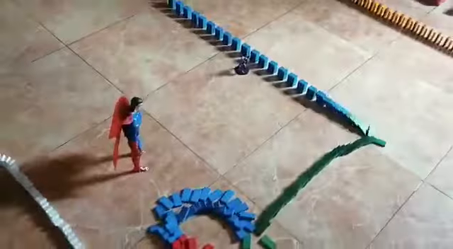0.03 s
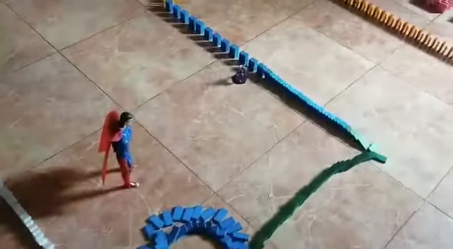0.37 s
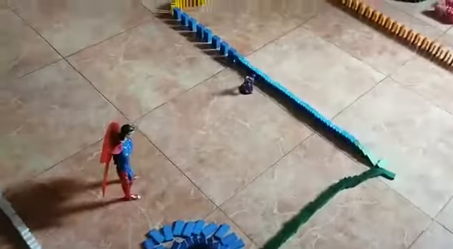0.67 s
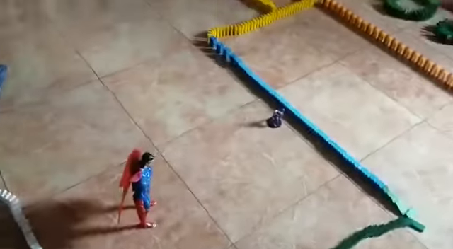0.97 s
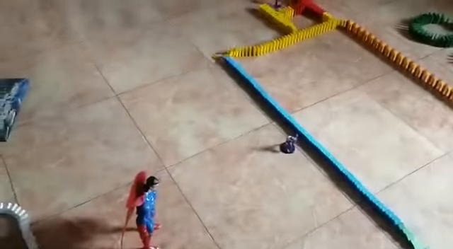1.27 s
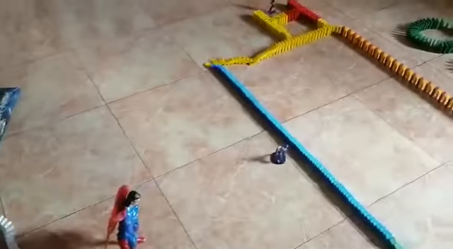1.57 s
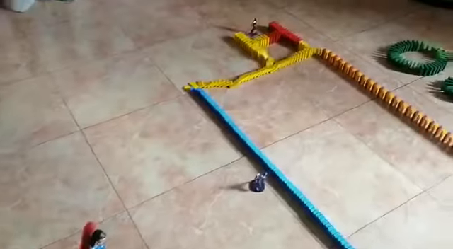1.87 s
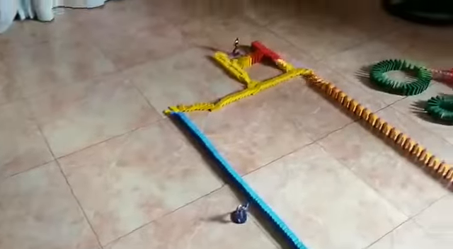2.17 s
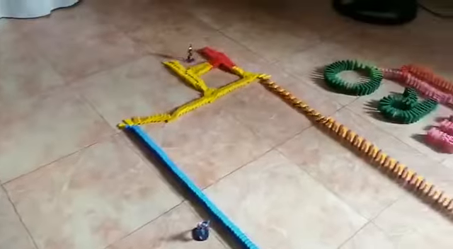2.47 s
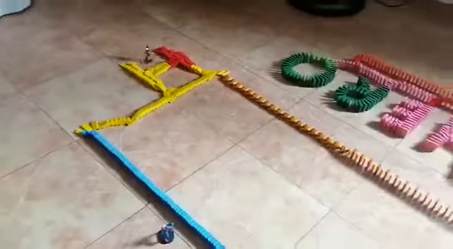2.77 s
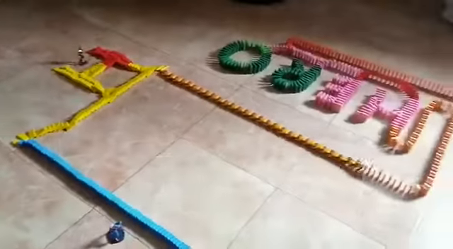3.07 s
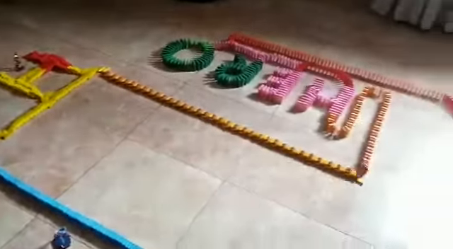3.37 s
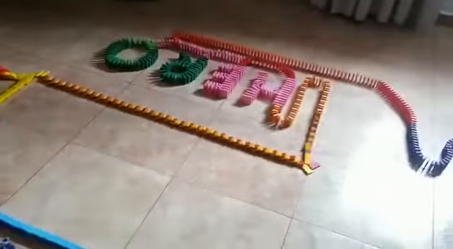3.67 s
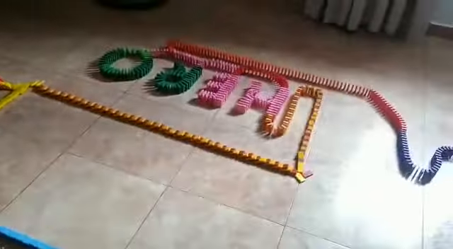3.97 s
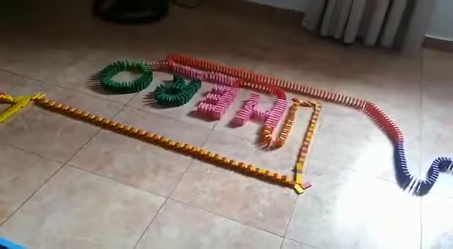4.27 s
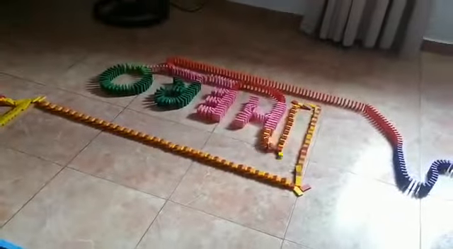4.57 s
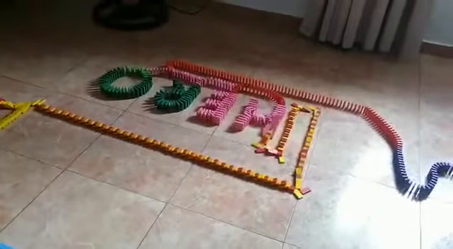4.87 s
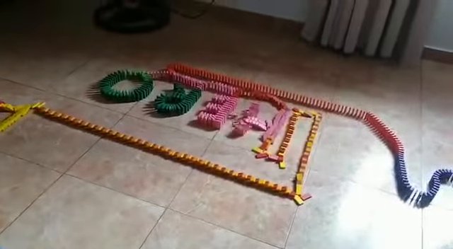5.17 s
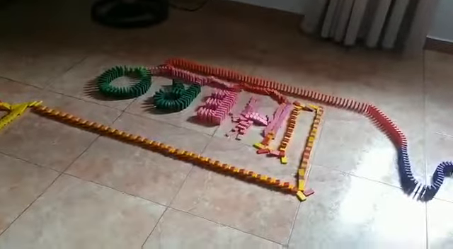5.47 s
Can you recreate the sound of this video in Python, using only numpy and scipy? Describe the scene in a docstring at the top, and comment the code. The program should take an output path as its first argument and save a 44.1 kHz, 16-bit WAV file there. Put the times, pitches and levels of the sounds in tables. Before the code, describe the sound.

Small plastic dominoes topple on a tiled floor, first clack by clack, then in a fast, dense clatter in an echoing room.

```python
"""A widely spaced row of plastic dominoes falls clack by clack on a tiled floor in a bare room.
Then a dense clatter runs along tight rows and sets off whole blocks, with hard hits and brief rings.
Each contact is a dry knock, a hollow clonk on the floor, a bright snap of the edges and a short ring
of the domino (a "tile" below). The room's echoes blur them over a low rumble."""
import sys
import numpy as np
from scipy import signal
from scipy.fft import rfft, irfft
from scipy.io import wavfile
from scipy.ndimage import uniform_filter1d

SR = 44100
rng = np.random.default_rng(int(sys.argv[2]) if len(sys.argv) > 2 else 0)


def store_pcm(level_fs):
    """Save levels as 16-bit WAV."""
    pcm = np.round(np.clip(level_fs, -1, 1) * 32767).astype(np.int16)
    wavfile.write(sys.argv[1], SR, np.atleast_2d(pcm).T)


N = 251811
TIME = np.arange(N) / SR
SIDES = np.array([[1], [-1]])  # left, right


# Tight rows: t/s, knock level/dB, clonk/dB, snap/dB, ring/dB (last three re knock), ring f/Hz
TIGHT_ROWS = [(1.06, -74, 13, -11, -7, 8000), (1.2, -57, -2, -9, -14, 7500),
              (1.26, -51, -3.5, 0.5, 3, 8000), (1.45, -49, -4.5, -15, -1, 8170),
              (1.64, -47, -5, -5.5, -0.5, 7700), (1.9, -45, -1, -6.5, -7, 7830),
              (2.3, -47.5, -1, -6.5, 2.5, 7750), (2.44, -47.5, -6.5, -3.5, -3, 7160),
              (2.62, -50, -3, -4, 0, 7750), (2.8, -55.5, 0, -5.5, 9, 8190),
              (2.94, -53.5, -1, -1, 3.5, 7870), (3.05, -53, -2.5, -13, 3.5, 8200),
              (3.15, -49, -7, -7, 4, 8620), (3.24, -51.5, -2.5, -7, -8.5, 8700),
              (3.4, -56, -5, 2, -14, 7640), (3.58, -50, -3, -10, 1, 8250),
              (3.75, -51.5, -4, -5.5, 2.5, 8700), (3.9, -58.5, 1.5, -7.5, 0, 8100),
              (3.99, -48, -7.5, -11.5, -2.5, 7180), (4.14, -57, 0, 2.5, -6, 7700),
              (4.27, -51.5, 0, -6.5, 4, 7950), (4.35, -51.5, -2, -5, 6, 7830),
              (4.42, -57.5, 0.5, -2, 3, 7300), (4.5, -55.5, -7, -1.5, 8, 7460),
              (4.68, -52.5, -0.5, -13, -5.5, 7500), (4.76, -52.5, 1.5, -3, 3.5, 7260),
              (5.06, -54.5, 4, 1, -8, 7860), (5.12, -48.5, -0.5, -2, -3, 7970),
              (5.4, -47.5, -5, -5.5, -5, 7540), (5.5, -53, 1.5, -5, 1, 7450),
              (5.71, -46.5, 1.5, -4, 2, 7530)]
def clatter(count=280, trim_db=-3, snap_trim_db=4, ring_trim_db=-3, tile_detune=0.0455):
    """Tiles fall along tight rows at an even pace; each keeps its own pitch as it chatters."""
    t_s, *columns = np.transpose(TIGHT_ROWS)
    span_s = t_s[-1] - t_s[0]
    falls_s = t_s[0] + span_s * (np.arange(count) + rng.random(count)) / count
    times_s, force_db = chatter(falls_s, span_s, chatter_s=0.014, scatter_db=4, bounce_gain_db=0.05)
    db, clonk_db, snap_db, ring_db, ring_hz = (np.interp(times_s, t_s, c) for c in columns)
    pan_db = np.interp(times_s, t_s[[0, -1]], (-5, -1.5))  # the microphone turns after the falling front
    own_pitch = np.repeat(np.exp(tile_detune * rng.standard_normal(count)), len(times_s) // count)
    return contacts(times_s, db + force_db + trim_db, clonk_db, snap_db + snap_trim_db,
                    ring_db + ring_trim_db, ring_hz * own_pitch, pan_db,
                    ring_detune=0.014, clonk_hz=2740, clonk_detune=0.0706, clonk_ring_db=-10.5)


# Falling blocks: t/s, length/s, knock level/dB, clonk/dB, snap/dB, ring/dB (last three re knock)
BLOCKS = [(1.351, 0.16, -51.5, -4.5, -11, -18), (1.508, 0.06, -46.5, -7, -10, -10),
          (2.058, 0.072, -45.5, -29, -3, -6), (2.139, 0.15, -48.5, 1.5, -7, -10),
          (2.333, 0.045, -40, -15, -8, -5), (3.259, 0.077, -49, -19.5, -11.5, -20),
          (4.8, .15, -51, 3.5, -22, -3), (4.93, .11, -53.5, 4.5, -15, -9),
          (5.168, 0.15, -44, -16, -8.5, -8), (5.594, 0.2, -57.5, 5, -11, -3)]
# Landing on a heap, less body than on the floor: f/Hz, level/dB
HEAP_EQ = [(700, -4.5), (1400, -1), (2200, -0.5)]
def collapses(count=13, edge_db=-4, trim_db=-2, snap_trim_db=7, ring_trim_db=-3):
    """A block goes down in one swell of tiles, loudest in the middle."""
    rows = []
    for start_s, length_s, db, *colour_db in BLOCKS:
        falls_s = start_s + length_s * (np.arange(count) + rng.random(count)) / count
        times_s, force_db = chatter(falls_s, length_s, chatter_s=0.008, scatter_db=-5.5, tile_db=-3)
        swell_db = edge_db * (2 * (times_s - start_s) / length_s - 1) ** 2
        rows.append(np.c_[times_s, db + force_db + swell_db, np.tile(colour_db, (len(times_s), 1))])
    times_s, db, clonk_db, snap_db, ring_db = np.vstack(rows).T
    tiles = contacts(times_s, db + trim_db, clonk_db, snap_db + snap_trim_db, ring_db + ring_trim_db,
                     ring_hz=7450, pan_db=-3.5, ring_detune=0.03,
                     clonk_hz=2876, clonk_detune=0.132, clonk_ring_db=-9)
    return shaped(tiles, HEAP_EQ)


# Wide row: t/s, knock level/dB, rebound/dB, clonk/dB, snap/dB (these re knock), clonk f/Hz, ring f/Hz
WIDE_FALLS = [(0.0004, -47.5, -8, -6.5, -3.5, 2740, 7900), (.057, -52.5, -2, -1, -1, 2950, 7400),
              (.127, -50.5, -5, -1.5, 0.5, 2630, 7960), (0.183, -55.5, -0.5, 2.5, 0, 2420, 7850),
              (0.2492, -56, -5, -1, -3.5, 2840, 8600), (0.316, -47.5, 1.5, -1, -7, 2640, 7400),
              (0.369, -56.5, 4.5, 0, 2, 2560, 7660), (0.434, -49.5, 1.5, -5.5, -0.5, 2700, 8800),
              (0.5073, -55.3, 0.5, -4, 4, 2700, 7870), (0.5756, -51.5, -5, 0.5, -1, 2650, 8100),
              (0.6288, -61, 6, 3.5, 0.5, 2420, 8000), (0.7026, -52.5, 0, 0, -3, 2550, 7900),
              (0.778, -51, -3, -3, 1, 2580, 8030), (.832, -55, 1, -3.5, 1.5, 2630, 9230),
              (0.9236, -51, -0.5, 2, -0.5, 2730, 7300), (.982, -55, -7, 6, 2, 2880, 8800),
              (1.06, -57, -2, 4, -2, 3100, 7850)]
# One clack, two strike touches then three rebounds: delay/s, level/dB, extra clonk/dB
CLACK_TOUCHES = [(0, -1.2, -0.5), (.0018, -3, 3), (.0074, -1.5, 0.5), (.0122, -8, 2), (.0205, -9, -12)]
# A lone tile, landing more softly than a packed row: f/Hz, level/dB
LONE_TILE_EQ = [(800, 3), (2000, 3.5), (9500, 2.5), (12000, -1.5), (15000, 2.5)]
def wide_row(hit_s=0.0044, jitter_s=0.0005, dulling_db=-8):
    """A tile strikes the next with a bright double tick; the leaning stack knocks, duller and fading."""
    falls = np.repeat(WIDE_FALLS, len(CLACK_TOUCHES), axis=0)
    t_s, db, rebound_db, clonk_db, snap_db, clonk_hz, ring_hz = falls.T
    delay_s, touch_db, hollow_db = np.tile(CLACK_TOUCHES, (len(WIDE_FALLS), 1)).T
    is_rebound = np.tile(np.arange(len(CLACK_TOUCHES)), len(WIDE_FALLS)) >= 2
    times_s = t_s + delay_s + is_rebound * jitter_s * rng.uniform(-1, 1, len(t_s))
    energy_db = db + 10 * np.log10(hit_s * SR) + touch_db + is_rebound * rebound_db
    edge_db = snap_db + 1 + is_rebound * dulling_db  # a sharper contact both snaps and rings more
    hits = contacts(times_s, energy_db, clonk_db + hollow_db, edge_db, edge_db, ring_hz,
                    pan_db=-2 - 5 * is_rebound, ring_detune=0.0091,
                    clonk_hz=clonk_hz, clonk_detune=0.064, clonk_ring_db=-10.5, knock_s=0.0011)
    return shaped(hits, LONE_TILE_EQ)


def settling(count=20, slide_s=0.08, level_db=-62, fade_db_per_s=110, scatter_db=3):
    """After each fall the wide row slides down on itself in a fading patter."""
    t_s, _, _, clonk_db, snap_db, clonk_hz, ring_hz = np.repeat(WIDE_FALLS, count, axis=0).T
    age_s = slide_s * rng.random(len(t_s))
    energy_db = level_db + 10 * np.log10(slide_s * SR / count) - fade_db_per_s * age_s
    energy_db += scatter_db * rng.standard_normal(len(t_s))
    return contacts(t_s + age_s, energy_db, clonk_db - 1, snap_db, ring_db=snap_db - 4,
                    ring_hz=ring_hz, pan_db=-5, ring_detune=0.058,
                    clonk_hz=clonk_hz, clonk_detune=0.112, clonk_ring_db=-11.5)


# Hard landings: t/s, knock level/dB, clonk/dB, snap/dB, ring/dB (these re knock), ring f/Hz, L-R/dB
HARD_LANDINGS = [(0.327, -51, -9, -8, -7, 7100, 3), (0.3358, -53, -12, -8, -1, 6900, -6),
                 (0.935, -66, 1, -12, -16, 7400, -4), (0.944, -56, -8, -16, -12, 6540, -4),
                 (0.946, -52, -2, -14, -12, 6500, -2), (0.9893, -44, -2, -14, -10, 7460, -5),
                 (1.218, -49, -17, -17, 6, 7700, -5), (1.239, -54, -19, 3, 3, 7760, 6),
                 (1.432, -45.5, -15.5, 2, 2.5, 7760, 0), (1.6585, -55, -2, -8, 6, 8000, -3),
                 (1.9003, -45, -10, -3, 7, 8920, -2), (1.9835, -48, -1, -8, 0, 7600, -2),
                 (2.017, -43, -8, -4, 3, 7540, 1), (2.081, -44, -16, 1, 6, 7500, 5),
                 (2.0915, -46, -14, 5, 0, 7500, 0), (2.1025, -44, -10, 6, 0, 7300, -2),
                 (2.166, -45, 1, -8, -6, 7600, -2), (2.193, -43.5, -0.5, -10, -6, 7600, -4),
                 (2.341, -45, -22, 6, 4, 7440, 7), (2.348, -38, -6, 3, -5, 7200, -7),
                 (2.355, -45, -14, 4, -7, 7200, -8), (2.3627, -43, -14, -2, 0, 7397, -3),
                 (2.367, -50, -9, -5, 15, 7440, 3), (2.6994, -51.5, 0, -6, 16, 8000, -10),
                 (3.289, -45.5, 3.5, -5, -8, 7700, 1), (3.304, -40, -16, -15, -18, 7600, 1),
                 (3.309, -40, -18, -13, -15, 7650, -7), (3.313, -44, -8, -14, -12, 7700, -2),
                 (3.367, -54, -14, 3, 5, 10500, 4), (3.533, -60, -8, -12, -4, 8100, -4),
                 (3.552, -48, -0.5, -11, -7, 8250, 1), (3.7295, -50, -2, -9, 6.5, 8300, 3),
                 (3.93, -51.5, -2, -10, -4, 7300, 11), (4.005, -48, -9, -7, -4, 7250, -5),
                 (4.0617, -48, -19, 10, -3, 9500, 3), (4.327, -51, -16, 7, 10, 7830, -2),
                 (4.381, -49.5, -12, -4, 12, 7660, -2), (4.4393, -45.5, -20, 1, 2, 7350, 7),
                 (4.4398, -51, -23, 5, 6, 4750, -7), (4.4418, -49, -20, -2, 1, 7450, 0),
                 (4.4472, -54, -16, -4, -5, 4750, 2), (4.4534, -51, -18, 10, 16, 7450, 0),
                 (4.4613, -54, -16, 4, 13.5, 7520, -4), (4.468, -54, -19, 0, 12, 6960, -4),
                 (4.495, -60, -16, 0, 10, 7500, -2), (4.4764, -53, -19, 7, 13, 7340, -6),
                 (4.6849, -50, 2, -14, 4, 4360, 5), (4.703, -48, 6, -14, -6, 4200, 5),
                 (4.7458, -46, -1, -1, -4, 10100, -1), (5.103, -49, -12, 4, 0, 7450, -4)]
def hard_hits(count=3, hit_s=0.0018, rebound_s=0.0011, rebound_loss_db=7,
              trim_db=1, snap_trim_db=1, ring_trim_db=-3):
    """A single tile lands hard; its quick rebounds die away."""
    t_s, db, clonk_db, snap_db, ring_db, ring_hz, pan_db = np.repeat(HARD_LANDINGS, count, axis=0).T
    bounce = np.tile(np.arange(count), len(HARD_LANDINGS))
    times_s = t_s + rebound_s * bounce * (1 + rng.random(len(t_s)) / 2)
    energy_db = db + trim_db + 10 * np.log10(hit_s * SR) - rebound_loss_db * bounce
    hits = contacts(times_s, energy_db, clonk_db, snap_db + snap_trim_db, ring_db + ring_trim_db,
                    ring_hz, pan_db, ring_detune=0.0035, colour_scatter_db=-3, knock_s=0.0012)
    return shaped(hits, LONE_TILE_EQ)


def ticks(count=90, touches=3, above_row_db=15.5, scatter_db=1.5, low_hz=2500, high_hz=5500,
          t60_s=0.014, bounce_s=0.0074, bounce_loss_db=4, pan_db=-2):
    """Here and there a tile springs free of the tight rows and bounces, ringing at its own pitch."""
    t_s, row_db = np.transpose(TIGHT_ROWS)[:2]
    offset, pace, force, pitch = rng.random((count, 4)).T
    starts_s = t_s[0] + (t_s[-1] - t_s[0]) * (np.arange(count) + offset) / count
    bounce = np.arange(touches)
    times_s = (starts_s[:, None] + bounce_s * (0.5 + pace[:, None]) * bounce).ravel()
    first_db = np.interp(starts_s, t_s, row_db) + above_row_db + scatter_db * (2 * force - 1)
    energy_db = (first_db[:, None] - bounce_loss_db * bounce).ravel()
    hz = np.repeat(low_hz * (high_hz / low_hz) ** pitch, touches)
    rings = ringing(hz, [(1, 0, t60_s), (1.62, -3, t60_s)])
    return place(times_s, rings, undb(energy_db + SIDES * pan_db / 2))


# Brief rings, the highest during the loud crash: t/s, length/s, nominal f/Hz, level/dB
BRIEF_RINGS = [(0.507, 0.037, 7860, -69), (0.987, .11, 2930, -59), (1.118, .08, 10660, -63.5),
               (1.438, 0.044, 10280, -50), (1.642, 0.045, 7780, -47), (1.83, 0.047, 6870, -53),
               (2.342, 0.076, 14600, -54), (2.365, 0.092, 7300, -49.5), (2.7, 0.084, 7900, -64),
               (2.794, 0.068, 11800, -59), (3.086, 0.095, 12240, -59), (3.358, 0.089, 10660, -57),
               (3.58, 0.18, 11600, -65), (3.598, 0.18, 12850, -62), (4.46, 0.12, 4770, -61),
               (4.813, .04, 7800, -51), (5.013, 0.028, 4820, -54), (5.371, 0.056, 7600, -49)]
def brief_rings(count=14, fade_db=-5, t60_s=0.037, detune=0.022, pan_db=-2):
    """Brief high ringing amid the clatter: a fading run of quick pings around one pitch."""
    t_s, length_s, hz, db = np.repeat(BRIEF_RINGS, count, axis=0).T
    progress = (np.tile(np.arange(count), len(BRIEF_RINGS)) + rng.random(len(t_s))) / count
    energy_db = db + 10 * np.log10(length_s * SR / count) + fade_db * progress
    detuned_hz = hz * np.exp(detune * rng.standard_normal(len(t_s)))
    rings = ringing(detuned_hz, [(0.98, 0.0085, t60_s)], size=1024)
    return place(t_s + length_s * progress, rings, undb(energy_db + SIDES * pan_db / 2))


# Dry knock, tile on tile: f/Hz, level/dB
KNOCK_EQ = [(300, -41), (800, -19), (1400, -24), (2200, -13), (3200, -4.5), (4000, -0.5), (5000, -0.5),
            (6300, -1.5), (7800, -4), (9500, -16), (15000, -33.5)]
# Hollow clonk, tile on stone floor: f/Hz, level/dB
CLONK_EQ = [(250, -20.5), (550, -20.5), (780, -16.5), (1300, -7), (1650, -6), (2100, -1.5), (2650, -5.5),
            (3100, -0.5), (3700, 0), (5000, -9), (10000, -29)]
# Bright snap, edge on edge: f/Hz, level/dB
SNAP_EQ = [(3000, -34.5), (6500, 1), (8500, 3), (9600, 4), (10500, -1.5), (11500, -5), (13000, -8.5),
           (14500, -14)]
# Bending modes of a tile: ratio to ring pitch, level/dB, t60/s
BENDING_MODES = [(0.632, -17.5, 0.0067), (0.998, 0, 0.023), (1.3, -23, 0.015), (1.5, -31, 0.047),
                 (2, -21, 0.018)]
def contacts(times_s, energy_db, clonk_db, snap_db, ring_db, ring_hz, pan_db, ring_detune, clonk_hz=2900,
             clonk_detune=0.144, clonk_ring_db=-10, colour_scatter_db=1.5, knock_s=0.00087):
    """Each contact knocks, clonks, snaps and rings its tile, never at quite the same pitch."""
    count = len(times_s)
    draws = rng.standard_normal((count, 6)).T
    pan_draw, clonk_draw, ring_draw = draws[:3]
    gain = undb(energy_db + SIDES * (pan_db + 2 * pan_draw) / 2)
    colour_db = np.array([clonk_db, snap_db, ring_db]) + colour_scatter_db * draws[3:]
    clonk_gain, snap_gain, ring_gain = undb(colour_db)
    hollow = ringing(clonk_hz * np.exp(clonk_detune * clonk_draw), [(0.96, clonk_ring_db, 0.02)])
    slap = crack(count, decay_s=0.0016, size=512) / np.sqrt(2)
    knock = shaped(place(times_s, crack(count, decay_s=knock_s), gain), KNOCK_EQ)
    clonk = shaped(place(times_s, slap + hollow, gain * clonk_gain), CLONK_EQ)
    snap = shaped(place(times_s, crack(count, decay_s=0.0031), gain * snap_gain), SNAP_EQ)
    bending = ringing(ring_hz * np.exp(ring_detune * ring_draw), BENDING_MODES)
    return knock + clonk + snap + place(times_s, bending, gain * ring_gain)


def chatter(falls_s, span_s, chatter_s, scatter_db, tile_db=0, bounce_gain_db=0, touches=9):
    """Tiles chatter on neighbour and floor: contact t/s and level/dB, unit power over the span."""
    count = len(falls_s)
    gaps_s = chatter_s * rng.random((count, touches)) / 2
    times_s = (falls_s[:, None] + np.cumsum(gaps_s, axis=1) - chatter_s).ravel()
    force_db = tile_db * rng.random((count, 1)) + scatter_db * rng.random((count, touches))
    force = undb(force_db + bounce_gain_db * np.arange(touches)).ravel()
    return times_s, 20 * np.log10(unit(force) * np.sqrt(span_s * SR))


def crack(count, decay_s, size=128):
    """Impacts as short decaying noise bursts, different in each channel."""
    return unit(rng.standard_normal((count, 2, size)) * np.exp(-np.arange(size) / SR / decay_s))


def ringing(hz, modes, size=512):
    """Damped modes (pitch ratio, level/dB, t60/s), in random phase per channel."""
    t_s = np.arange(size) / SR
    rings = 0
    for ratio, mode_db, t60_s in modes:
        phase = 2 * np.pi * rng.random((len(hz), 2, 1))
        fade = undb(mode_db) * np.sqrt(2) * unit(np.exp(-np.log(1000) * t_s / t60_s))
        rings = rings + fade * np.sin(2 * np.pi * ratio * hz[:, None, None] * t_s + phase)
    return rings


# Reverberation of the bare room: f/Hz, t60/s
ROOM_DECAY = [(500, 0.26), (3000, 0.68), (8000, 0.49), (15000, 0.21)]
def room_response(tail_db=-1, early_db=-5, early_s=0.014, first_wall_s=0.005):
    """Near walls return a spray of echoes; a diffuse tail fades, the top treble first."""
    t_s = TIME[:2 ** 15]
    hz = np.fft.rfftfreq(len(t_s), 1 / SR)
    noise = rfft(rng.standard_normal((2, len(t_s))))
    centres_hz = np.geomspace(500, 16000, 6)
    tail = 0
    for centre_hz, share in zip(centres_hz, np.eye(len(centres_hz))):
        band = irfft(noise * at_hz(np.c_[centres_hz, share], hz), len(t_s))
        tail = tail + band * np.exp(-np.log(1000) * t_s / at_hz(ROOM_DECAY, centre_hz))
    early = rng.standard_normal((2, len(t_s))) ** 3 * np.exp(-t_s / early_s)  # cubed: sparse spikes
    arrived = t_s > first_wall_s
    return undb(tail_db) * unit(tail * arrived) + undb(early_db) * unit(early * arrived)


def room(x, spots=7, spots_per_s=30):
    """The falling front moves on, so the echoes change: a cycle of responses, one per floor spot."""
    spot = (TIME * spots_per_s).astype(int) % spots
    gates = (uniform_filter1d(1.0 * (spot == k), size=128) for k in range(spots))
    return sum(signal.oaconvolve(x * gate, room_response(), axes=1)[:, :N] for gate in gates)


# Course of the rumble: t/s, level/dB
RUMBLE_LEVEL = [(0, -67.5), (.2, -68.5), (.36, -69.5), (.6, -66), (.92, -67.5), (1.05, -66), (1.21, -68),
                (1.45, -70.5), (1.68, -71.5), (1.77, -77.5), (1.94, -69.5), (2.12, -79), (2.35, -70.5),
                (2.47, -81), (2.69, -68), (3.18, -72), (3.33, -73.5), (3.6, -71), (4.1, -72), (4.6, -73.5),
                (4.82, -72), (4.93, -69.5), (5.1, -74), (5.37, -79), (5.54, -69), (5.71, -77)]
# Its base: f/Hz, level/dB
RUMBLE_EQ = [(20, 3.5), (50, 1.5), (82, 1.5), (110, -4.5), (150, -5), (200, -5), (270, -5.5), (400, -7.5),
             (700, -11.5), (2000, -3), (15000, -44)]
# Its upper-bass body: f/Hz, level/dB
BODY_EQ = [(40, -9.5), (90, -4), (190, -3.5), (310, -12), (450, -19.5), (1500, -43)]
def rumble(base_db=3, body_db=1, body_growth=0.83, pan_db=-3.5):
    """A soft low rumble swells and sinks, fuller in the upper bass as it swells."""
    db = np.interp(TIME, *np.transpose(RUMBLE_LEVEL))
    base = shaped(rng.standard_normal((2, N)), RUMBLE_EQ) * undb(base_db)
    body = shaped(rng.standard_normal((2, N)), BODY_EQ) * undb(body_db + body_growth * (db - db.max()))
    return (base + body) * undb(db + SIDES * pan_db / 2)


def undb(db):
    """Decibels to gain."""
    return 10 ** (np.asarray(db) / 20)


def unit(x):
    """Scale each row to unit energy."""
    return x / np.sqrt(np.sum(x ** 2, axis=-1, keepdims=True))


def at_hz(points, hz):
    """Read a (f/Hz, value) table on a log-frequency axis."""
    points_hz, value = np.transpose(points)
    return np.interp(np.log(np.maximum(hz, 1)), np.log(points_hz), value)


def shaped(x, eq, size=2048):
    """Minimum-phase filter from a (f/Hz, level/dB) table; white input keeps its power."""
    cepstrum = irfft(np.log(undb(at_hz(eq, np.fft.rfftfreq(size, 1 / SR)))))
    causal = cepstrum * (1 + np.sign(np.fft.fftfreq(size)))
    impulse = unit(irfft(np.exp(rfft(causal))))
    return signal.oaconvolve(x, impulse[None], axes=1)[:, :N]


def place(times_s, waves, gains):
    """Sum waves (contact, channel, sample) at their times, with gains (channel, contact)."""
    index = (np.maximum(times_s, 0) * SR).astype(int)[:, None] + np.arange(waves.shape[-1])
    channels = (waves[:, c] * gains[c][:, None] for c in range(2))
    return np.array([np.bincount(index.ravel(), channel.ravel(), N)[:N] for channel in channels])


def scene(chain_send_db=1.5, wide_send_db=-0.5, hit_send_db=-4):
    """Dominoes, echo and rumble; the far, dense rows are wetter than the single hits."""
    chain = clatter() + collapses() + settling() + brief_rings()
    wide = wide_row()
    hits = hard_hits() + ticks()
    echo = room(undb(chain_send_db) * chain + undb(wide_send_db) * wide + undb(hit_send_db) * hits)
    return chain + wide + hits + echo + rumble()


# Stereo width of two close microphone ports: f/Hz, side re mid/dB
PORT_WIDTH = [(25, 3), (60, -4.5), (130, -6.5), (550, -6.5), (1000, -2), (2000, 0)]
# Mismatch of the ports: f/Hz, L-R/dB
PORT_BALANCE = [(100, -0.5), (600, 2.5), (1500, 0.5), (2700, -4.5), (4000, -1), (5800, -1), (7600, 4),
                (9200, 3), (11000, 1.5), (13000, -4.5), (15000, -1)]
def record(dry, top_hz=15400):
    """Two close microphone ports share the bass and colour the treble differently; the top is cut."""
    hz = np.fft.rfftfreq(N, 1 / SR)
    left, right = rfft(dry)
    width = undb(at_hz(PORT_WIDTH, hz))
    ports = (left + right + SIDES * width * (left - right)) / np.sqrt(2 + 2 * width ** 2)
    coloured = irfft(ports * undb(SIDES * at_hz(PORT_BALANCE, hz) / 2), N)
    return signal.sosfilt(signal.ellip(10, 0.2, 70, top_hz, fs=SR, output="sos"), coloured)


dry = scene()
out = record(dry)
store_pcm(out)
```